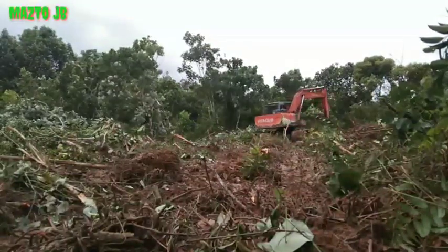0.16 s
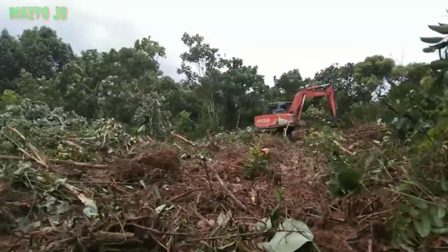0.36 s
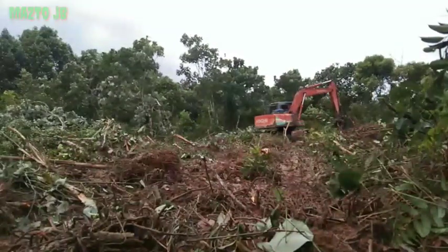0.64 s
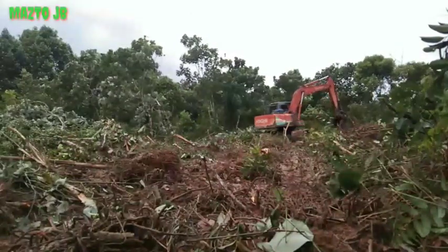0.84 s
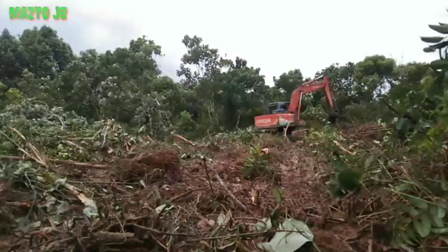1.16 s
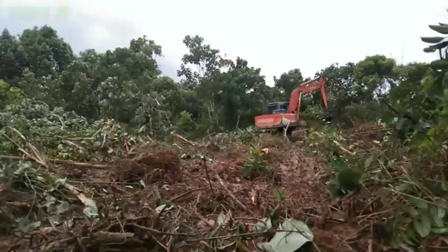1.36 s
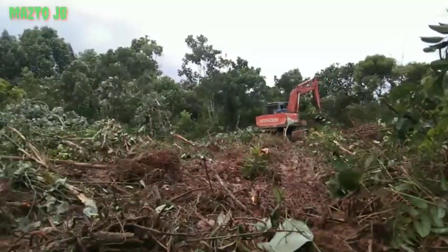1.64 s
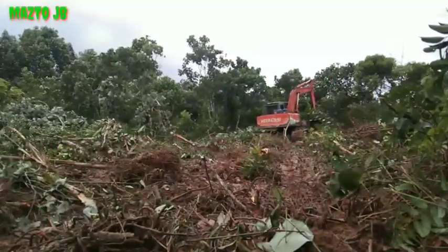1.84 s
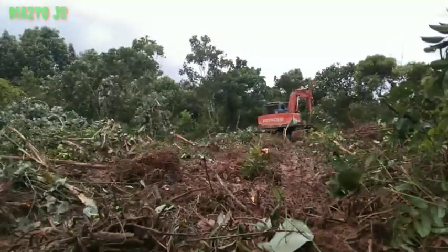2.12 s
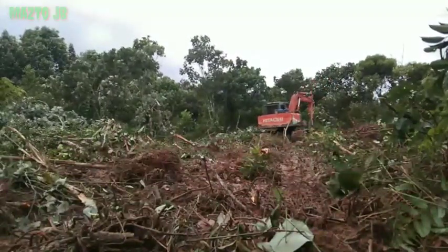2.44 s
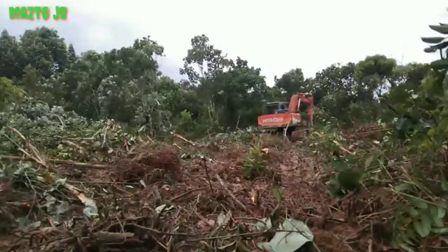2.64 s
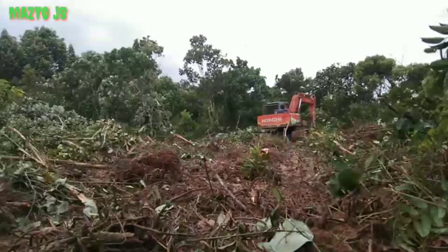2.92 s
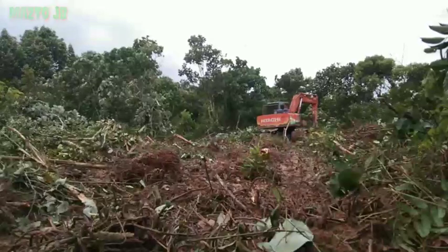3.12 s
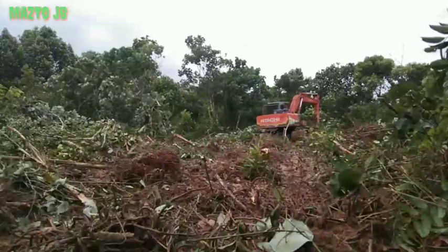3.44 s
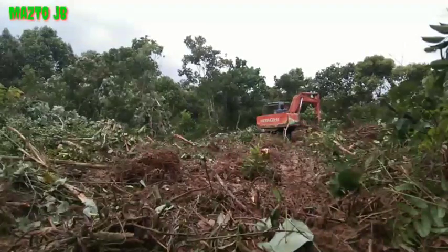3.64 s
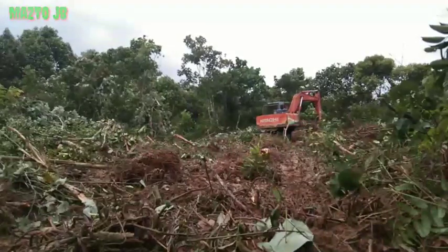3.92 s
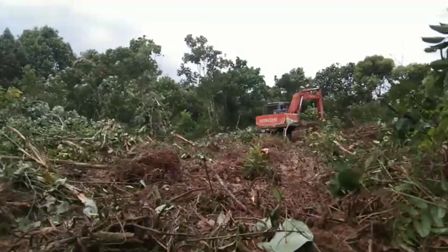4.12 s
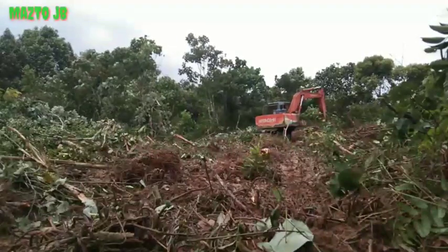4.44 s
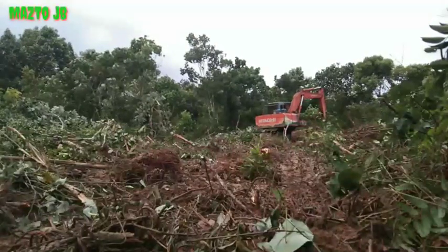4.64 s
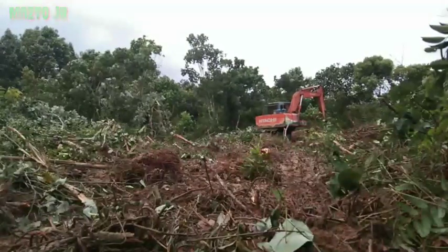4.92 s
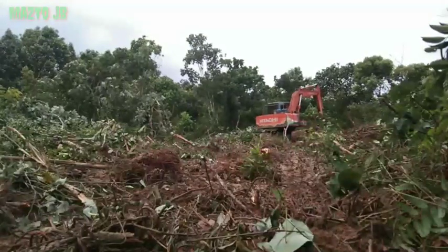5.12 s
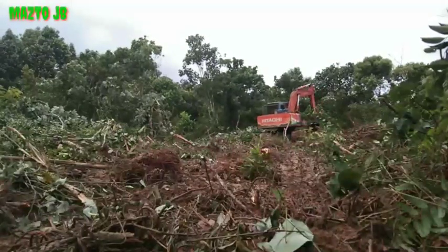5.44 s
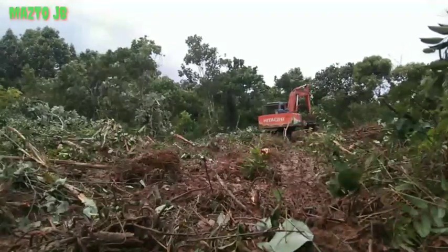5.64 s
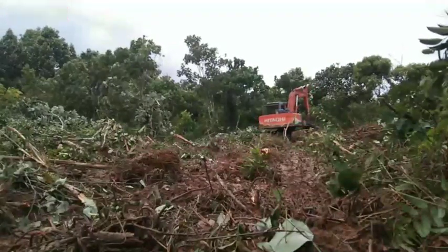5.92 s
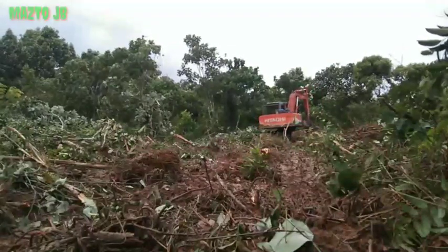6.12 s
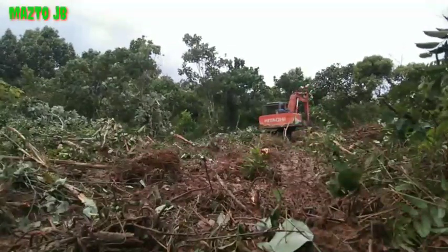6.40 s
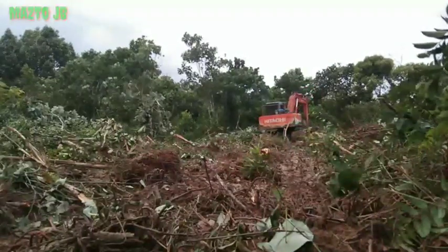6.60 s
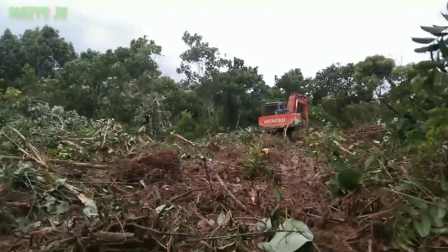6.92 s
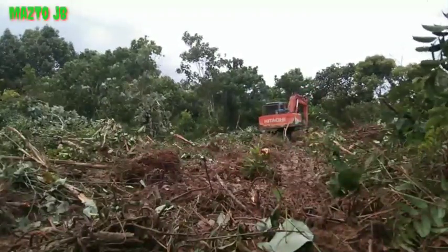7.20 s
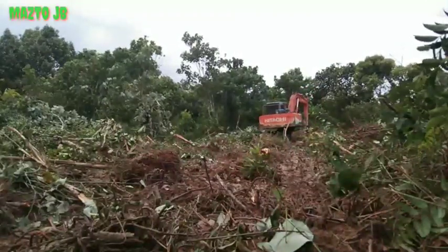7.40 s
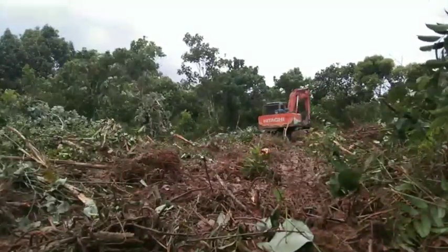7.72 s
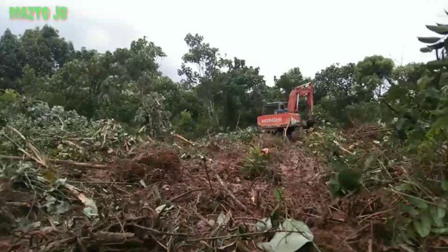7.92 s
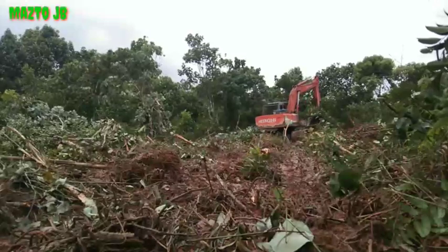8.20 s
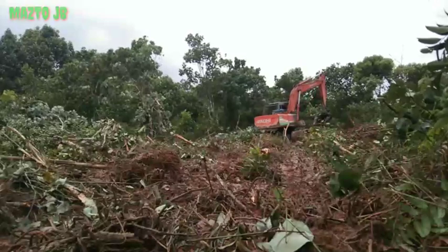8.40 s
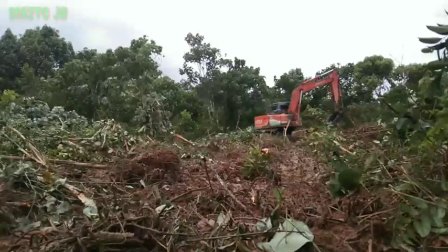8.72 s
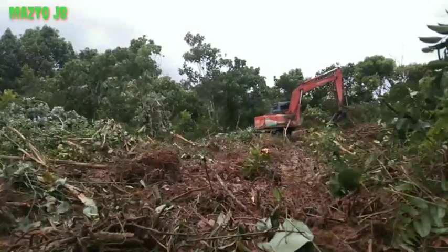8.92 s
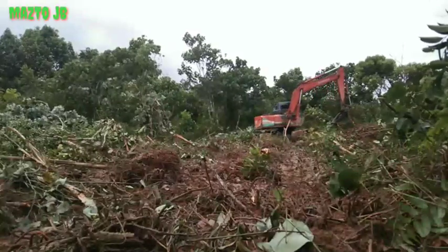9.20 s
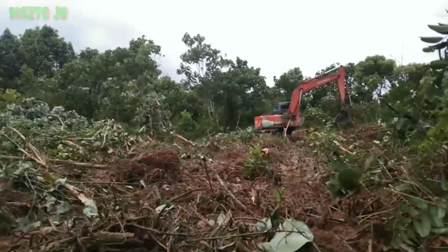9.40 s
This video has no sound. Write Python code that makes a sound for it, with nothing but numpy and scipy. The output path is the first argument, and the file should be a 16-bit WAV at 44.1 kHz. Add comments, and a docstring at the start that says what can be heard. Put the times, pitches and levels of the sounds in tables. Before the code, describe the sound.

Sharp, woody branch cracks with short diffuse forest echoes stand far above a quiet bed of engine hum and soft broadband wash. They open densely, thin out, nearly stop around four seconds, then build to the loudest splintering just after seven. Hollow knocks, twig ticks, brief hydraulic whines and blurred steel bucket rings accompany them, heard at a distance through a noise-suppressing camera microphone.

```python
"""A distant excavator clears brush at the edge of a forest. Its diesel is a few unsteady exhaust orders,
its hydraulic pump a gliding tone with an octave, its bucket a set of blurred steel modes.
Branches break as bursts of coloured clicks with forest echoes; knocks, twigs and stems ring like noise-blurred wood.
Leaves rustle, a thin band of treble flickers high up, a steady wash lies beneath,
and the camera's noise suppressor holds down whatever is faint."""
import sys
import numpy as np
from scipy import signal
from scipy.fft import irfft, next_fast_len
from scipy.io import wavfile
from scipy.ndimage import uniform_filter1d

SR = 44100
rng = np.random.default_rng(int(sys.argv[2]) if len(sys.argv) > 2 else 0)


def dump_mix(stems):
    """Bounce the given channels to the path in sys.argv[1] as a 16-bit WAV at rate SR."""
    frames = np.atleast_2d(stems).T  # one column per channel
    limited = np.clip(frames, -1, 1)  # hard clip at full scale
    pcm = np.round(limited * 32767).astype(np.int16)
    wavfile.write(sys.argv[1], SR, pcm)


N = 421155
T = np.arange(N) / SR
LEAD_S = .02  # a branch strains this long before it snaps

# Mean firing rate of the four-cylinder diesel, sagging under load: t/s, f/Hz
FIRING_RATE = [(0, 61.3), (.25, 61.45), (.6, 65.25), (1, 62.65), (2, 67.3), (3, 64.3), (4.1, 64.7),
               (4.5, 66.5), (5, 65.4), (5.55, 63.94), (6.6, 65.8), (7, 65.16), (7.4, 65.3), (7.8, 63.07),
               (8.55, 63.73), (8.8, 66.24), (9.15, 66.63), (9.55, 67.9)]
# Colour of green wood breaking, also lent to the leaves: f/Hz, relative level/dB
WOOD_COLOUR = [(60, -40.5), (150, -22.5), (240, -16.5), (320, -9.5), (420, -6.5), (550, -3.5), (860, 3),
               (1350, 3.5), (1900, 4), (2400, -1.5), (3050, -3.5), (3900, -10), (5200, -10), (6200, -14.5),
               (7600, -14.5), (8500, -36.5)]


def amp(db):
    """Decibels to gain."""
    return 10 ** (np.asarray(db) / 20)


def unit(x):
    """Scales to rms 1."""
    return x / np.sqrt(np.mean(x ** 2) + 1e-20)


def curve(rows):
    """Joins (t/s, value) rows by straight lines."""
    return np.interp(T, *np.transpose(rows))


def read(points, hz):
    """Reads (f/Hz, value) points on a log-frequency axis."""
    f, value = np.transpose(points)
    return np.interp(np.log(hz + 1), np.log(f + 1), value)


def add(mix, s, sound):
    """Mixes a sound in at time s, cutting what lies outside the mix."""
    start = round(s * SR)
    sound = sound[max(-start, 0):]
    part = mix[max(start, 0):][:len(sound)]
    part += sound[:len(part)]


def drift(rate_hz):
    """Random fluctuation of rms 1, mostly slower than rate_hz."""
    size = next_fast_len(N)
    hz = np.fft.rfftfreq(size, 1 / SR)
    hz = hz[hz < 8 * abs(rate_hz)]
    random_lines = rng.standard_normal((len(hz), 2)) @ [1, 1j]
    return unit(irfft(random_lines / (1 + (hz / rate_hz) ** 4), size)[:N])


def colour(x, db_at, size=2048):
    """Causal minimum-phase filter whose gain in dB is the function db_at(Hz)."""
    hz = abs(np.fft.fftfreq(size, 1 / SR))
    log_gain = np.log(amp(db_at(hz)))
    taps = np.fft.ifft(np.exp(np.conj(signal.hilbert(log_gain)))).real
    return signal.oaconvolve(x, taps)[:len(x)]


def bouts(rows, ramp_s, rest_db):
    """Level in dB that rises from rest before each (start, end, dB) row, holds, and falls back after it."""
    level = np.full(N, float(rest_db))
    for start, end, db in rows:
        # a row that ends before it starts rises only part of the way, or not at all
        held = np.clip(1 + np.minimum(T - start, end - T) / ramp_s, 0, 1)
        level = np.maximum(level, rest_db + held * (db - rest_db))
    return level


def drag():
    """How hard the bucket drags the brush, in dB; the pile takes a moment to move and never lies quite still."""
    # Pulls through the brush: start t/s, end t/s, level/dB
    pulls = [(-.3, 1.32, -55), (2.2, 3.38, -61.5), (4.5, 4.2, -60), (5.55, 7.4, -58), (7.3, 7.9, -50.5),
             (8.0, 8.46, -65)]
    return bouts(pulls, ramp_s=0.28, rest_db=-63)


def forest(x, near_db=8, near_s=0.002, build_s=0.0013, size=22050):
    """Sound arrives only by way of trunks and leaves: a near cluster, then a tail whose treble dies early."""
    # Echo of the forest edge: f/Hz, t60/s
    echo_times = [(200, 0.309), (900, 0.35), (2500, 0.24), (8000, 0.22)]
    t = T[:size]
    hz, frames_s, z = signal.stft(rng.standard_normal(size), SR, nperseg=256)
    fading = amp(-60 * frames_s / read(echo_times, hz)[:, None])
    tail = signal.istft(z * fading, SR, nperseg=256)[1][:size]
    near_cluster = 1 + amp(near_db) * np.exp(-t / near_s)
    tail = tail * (1 - np.exp(-t / build_s)) * near_cluster
    return signal.oaconvolve(x, tail / np.linalg.norm(tail))[:len(x)]


def blurred_noise(echoes, width_hz):
    """Complex noise through two equal poles: the slow random grain that many echoes give to a mode."""
    pole = np.exp(-np.pi * width_hz / SR)
    return signal.lfilter([1], [1, -2 * pole, pole ** 2], echoes)


def ring(hz, t60, build_s=0.00087, size=9000):
    """A narrow wooden resonance, blurred by its many echoes, at rms 1 over its first 25 ms."""
    t = T[:size]
    echoes = rng.standard_normal(size) + 1j * rng.standard_normal(size)
    tone = (blurred_noise(echoes, width_hz=130) * np.exp(2j * np.pi * hz * t)).real
    sound = tone * amp(-60 * t / t60) * (1 - np.exp(-t / build_s))
    return sound / np.std(sound[:SR // 40])


def wash(level_db=-64.0, swell_db=0.1):
    """Far noise of fan, exhaust and foliage: coloured noise that hardly swells."""
    # Colour of the wash: f/Hz, relative level/dB
    wash_colour = [(20, -14.5), (55, -13), (100, -2.5), (160, -3.5), (240, -9), (420, -10.5), (600, -7),
                   (1000, -13), (1400, -5.5), (2500, -13.5), (4000, -15.5), (6000, -19.5), (7500, -16),
                   (8500, -30)]
    noise = colour(rng.standard_normal(N), lambda hz: read(wash_colour, hz))
    return amp(level_db + swell_db * drift(5.9)) * unit(noise)


def treble_flicker(centre_hz=6850, width_hz=110, flicker_db=4.5):
    """A thin, flickering band of treble near 6.85 kHz that comes and goes."""
    # Bouts of the band: start t/s, end t/s, level/dB before the flicker
    treble_bouts = [(.25, .4, -65), (2.2, 2.45, -70), (3.4, 3.75, -72), (4.45, 4.65, -66.5),
                    (5.2, 5.7, -69.5), (7.7, 8.85, -68.5)]
    pitch_hz = centre_hz + 50 * drift(3.8)
    tone = drift(width_hz) * np.cos(2 * np.pi * np.cumsum(pitch_hz) / SR)
    flickering = unit(tone * amp(flicker_db * drift(15)))
    return amp(bouts(treble_bouts, ramp_s=0.096, rest_db=-78.5)) * flickering


def rustle(trim_db=-11, flicker_db=2.5, most_db=-55):
    """Leaves brush past each other in uneven gusts: wood-coloured noise that follows the drag up to a limit."""
    leaves = colour(rng.standard_normal(N), lambda hz: read(WOOD_COLOUR, hz))
    level_db = np.minimum(drag(), most_db) + trim_db + flicker_db * drift(2.7)
    return amp(level_db) * unit(leaves)


def creaks(spread_db=3.0, rest_db=-69, t60=0.3, count=130):
    """Bent stems creak and tick faintly as the pile shifts, each at a low pitch of its own."""
    out = np.zeros(N)
    for when, size, pitch in rng.random((count, 3)):
        hz = 560 + 1750 * pitch
        level_db = -spread_db * np.log(max(size, .1))
        add(out, when * T[-1], amp(level_db) * ring(hz, t60))
    # half as many dB as the drag rises above its resting -63 dB
    return amp(rest_db + .5 * (drag() + 63)) * unit(out)


def twigs(spread_db=2.0, trim_db=-8, t60=0.21, most_db=-60, follow=3.5, count=170, pitches_each=4):
    """Small twigs give way at random as brush is dragged, each ringing at a few pitches of its own."""
    # Colour of small twigs: f/Hz, relative level/dB
    twig_colour = [(500, 7), (900, -6.5), (1700, -3.5), (2600, -7), (4000, -7.5), (5200, -6), (7500, -3)]
    out = np.zeros(N)
    for when, size, *pitches in rng.random((count, 2 + pitches_each)):
        for hz in 700 + 7100 * np.array(pitches) ** 1.4:
            level_db = read(twig_colour, hz) - spread_db * np.log(max(size, .1))
            add(out, when * T[-1], amp(level_db) * ring(hz, t60))
    # steep below most_db of drag, level above it
    level_db = most_db + follow * np.minimum(drag() - most_db, 0) + trim_db
    return amp(level_db) * unit(out)


def knocks(trim_db=-2, ring_cycles=240, longest_t60=.26):
    """Wood knocks and ticks, from low limbs to thin high twigs; higher ones ring shorter."""
    # Wood knocks and ticks: t/s, f/Hz, level/dB before the trim
    struck_wood = [(.135, 213.4, -49.5), (.14, 1886, -38), (.24, 1353, -48), (.435, 1332, -38.5),
                   (0.862, 1360, -53.5), (1.23, 653.6, -59.5), (1.591, 2573, -44), (1.773, 2665, -53),
                   (2.024, 1940, -52.5), (2.135, 671, -53), (2.321, 1336, -42), (2.325, 2946, -47.5),
                   (2.544, 1071, -44.5), (2.932, 3200, -68), (3.031, 1984, -57.5), (3.06, 2760, -61),
                   (3.456, 1687, -56.5), (3.457, 5170, -63), (4.003, 1200, -58.5), (4.06, 3760, -70),
                   (4.18, 2780, -63.5), (4.19, 2138, -64.5), (4.29, 2040, -63), (4.596, 1857, -44),
                   (4.682, 5260, -56), (4.715, 889, -49), (4.713, 432, -53.5), (4.9, 644, -60),
                   (5.2, 835, -53), (5.27, 1460, -58.5), (5.146, 296, -51), (5.433, 4930, -63.5),
                   (5.727, 1960, -45), (6.011, 4670, -57), (6.17, 856, -36), (6.335, 935, -47.5),
                   (6.41, 1930, -58), (6.423, 823, -53), (6.512, 796.2, -49.5), (6.752, 1706, -52),
                   (6.855, 1705, -57.5), (7.21, 1274, -28.5), (7.265, 1466, -31.5), (7.4, 1723, -38),
                   (7.451, 1690, -32.5), (7.53, 1606, -37), (7.895, 1727, -55), (8.01, 3980, -67.5),
                   (8.065, 5040, -62), (8.072, 6080, -63), (8.085, 7000, -61.5), (8.25, 5210, -69),
                   (8.341, 2020, -62), (8.459, 1501, -60.5), (8.454, 303.4, -60), (8.577, 1420, -59),
                   (8.741, 1766, -48), (8.892, 1777, -61.5), (9.186, 1217, -61)]
    out = np.zeros(N)
    for s, hz, db in struck_wood:
        t60 = min(ring_cycles / hz, longest_t60)
        add(out, s, amp(db + trim_db) * ring(hz, t60))
    return out


def crack(db, body_db, bite_db, bright_db, fizz_db, tear_s, fibres_per_s=380, fibre_size=0.54, uneven_db=4,
          strain_s=0.0043, resonance_db=5, size=14000, level_samples=2200, splinters=2):
    """A few fibres give, the branch snaps, and the rest tear ever more weakly in separate echoing splinters."""
    t = T[:size] - LEAD_S
    # the core of the wood, 890 to 1820 Hz, is the same for all
    grade = [(417, body_db), (890, 0), (1820, 0), (3000, bite_db), (4940, bright_db), (7000, fizz_db)]
    tension = np.exp(np.where(t < 0, t / strain_s, -t / max(tear_s, .002)))
    sound = np.zeros(size)
    for splinter in range(splinters):
        unevenness = np.minimum(rng.exponential(1, size), 2) - 1
        strength = rng.choice([-1, 1], size) * amp(uneven_db * unevenness)
        fibres = strength * (rng.random(size) < fibres_per_s / splinters / SR)
        clicks = fibre_size * fibres * tension
        clicks[round(LEAD_S * SR)] = splinter == 0  # the first splinter carries the snap
        # each splinter has peaks and dips of its own
        mode_db = resonance_db * np.clip(rng.standard_normal(48), -2, 1.1)
        modes = np.column_stack([np.linspace(400, 8000, num=48), mode_db])
        wooden = colour(clicks, lambda hz: read(WOOD_COLOUR, hz) + read(grade, hz) + read(modes, hz))
        sound += forest(wooden, size=size)
    return amp(db) * sound / np.std(sound[:level_samples])


def branches(trim_db=-5):
    """All the breaks of the arm's work, each placed so that its snap falls on its time."""
    # Breaking branches: snap t/s, level/dB before the trim, body/dB, bite/dB, brightness/dB, fizz/dB,
    # splintering time/s (at least 0.002 is used)
    breaks = [(-.004, -33, 5, -0.5, 4, 0, 0.04), (.041, -34.5, 1, 0, 6, 0.5, 0.006),
              (.079, -38.5, -2, 3, -16.5, -6.5, 0.026), (.101, -38, 15.5, 6, 5.5, -5, 0.016),
              (.127, -29.5, 4, 4, 1.5, -1.5, 0.027), (.148, -30, 11, 3.5, 6, 7.5, 0.023),
              (.212, -34.5, 1, 2, 6, 0.5, .012), (.327, -51.5, 10, -16, -6.5, 7.5, 0.029),
              (.372, -52, -5, 1, 11.5, 0.5, 0.0066), (.42, -34, 8, 3.5, 6.5, -4, 0.021),
              (.479, -36.5, 1.5, 2, 7, -7, 0.011), (1.332, -42.5, 1.5, 4, -17, -11.5, 0.021),
              (1.355, -44.5, 9, 11, -3, 10.5, 0.0048), (1.404, -33.5, -1, 2.5, 6, -3.5, 0.0035),
              (1.573, -43.5, -15, -1, -14.5, -17, 0.026), (1.589, -46, -5.5, -4, 10.5, -8.5, 0.036),
              (1.633, -42, -3.5, 4.5, -2.5, -2, 0.0064), (1.707, -45.5, 9, 3, -11.5, -14.5, 0.0035),
              (1.774, -42.5, -2.5, -5.5, -12, -12, 0.03), (2.02, -52, 4, 1, -2, 4, 0.0024),
              (2.244, -51, 0, -13.5, -4, 6.5, 0.044), (2.323, -41.5, -14.5, 9.5, 10, 7, 0.024),
              (2.446, -49.5, 0, -6, -17.5, -16, 0.073), (2.502, -41, -2.5, -9, -16, -12, 0.02),
              (2.531, -34, 0.5, -6.5, 4.5, -1, .03), (2.578, -42.5, 0, 8, -6, 0, 0.013),
              (2.628, -38.5, -11, -1, 5.5, 1.5, 0.0063), (2.839, -51.5, -4.5, 4.5, 1, 2, 0.007),
              (3.031, -58.5, 3, 6, -6, -8, 0.0094), (3.06, -54, 0, 4.5, -11, 3, .012),
              (4.517, -50.5, 7, -9, -12, -15, 0.01), (4.591, -43.5, 0, -12, -9, -20.5, 0.036),
              (4.68, -47.5, 7.5, 0, -7, 5.5, 0.011), (4.712, -42.5, 12.5, -1, 9, 4, 0.0024),
              (4.85, -56, 1.5, -7.5, -5.5, 2.5, 0.02), (5.132, -35.5, -5, -3, -15, -18, 0.0095),
              (5.43, -42.5, -14.5, -5, -26.5, -7, 0.018), (5.46, -51.5, 10.5, -8.5, 5, -9.5, 0.0042),
              (5.511, -50, -6, -9, 0, 7.5, 0.016), (5.631, -54, 1.5, -6.5, -3, 8.5, 0.0095),
              (5.726, -41.5, 2, -5.5, 0.5, -9, 0.062), (5.819, -34, 2, 1, 4.5, -19, 0.016),
              (5.847, -39.5, -1.5, -4, -10, -5, 0.0047), (5.89, -35.5, 10.5, 3, -7.5, -5.5, 0.039),
              (5.912, -43.5, 1, -8, 15, 2, 0.029), (5.949, -32.5, 1.5, -3.5, -3.5, -6, 0.0064),
              (6.008, -37, 3.5, -5.5, 10.5, -10, 0.0097), (6.043, -46.5, 0.5, 5.5, 2.5, -9.5, 0.0081),
              (6.138, -43, 7, 3.5, 6.5, -4, 0.078), (6.168, -27.5, -4, 3.5, 4, 0.5, 0.02),
              (6.213, -35.5, 6.5, 5.5, 13.5, 5, 0.014), (6.335, -56, -5, -3, -1, -1, 0.013),
              (6.423, -52.5, 7.5, -10, -11.5, -11, 0.022), (6.513, -40, 5.5, -4.5, -1.5, -15.5, 0.0089),
              (6.555, -53.5, 9, -2.5, 11.5, 2.5, 0.0052), (6.707, -52.5, 15, -1.5, -6.5, 0.5, 0.0074),
              (6.748, -54.5, 4, 12, 19, 17, 0.069), (6.856, -72.5, -6.5, -4, -5, 4.5, 0.0073),
              (6.933, -58.5, -0.5, 0.5, 4, 7.5, 0.037), (7.205, -24, 3, 10, 2.5, 11.5, 0.03),
              (7.226, -32, -3.5, 1.5, 7.5, 1.5, 0.0082), (7.261, -26.5, 6.5, 4.5, 4.5, 7, 0.0306),
              (7.351, -38.5, 1.5, 3, 0, -11, 0.11), (7.436, -36.5, -3, 1, 5, -12, 0.037),
              (7.452, -31, 0, -1, -4, -7, 0.0027), (7.463, -31, 4.5, 1.5, 0.5, 0, 0.064),
              (7.52, -31.5, -9, 0.5, -1, -1, 0.017), (7.547, -43, -8.5, 6, 0, 6, 0.004),
              (7.609, -38, 5.5, -1.5, -14, -2.5, 0.019), (7.651, -32.5, 4.5, 1, 4, -2, 0.022),
              (7.689, -36, -4.5, 9.5, 5, 12, 0.0033), (7.785, -50, 1.5, -4.5, -4.5, -4.5, 0.015),
              (7.892, -53.5, 4.5, -1, 1, 9.5, 0.053), (8.489, -59.5, -2, -2.5, 7.5, 21, .02),
              (8.746, -55.5, -0.5, -8.5, -3.5, 2.5, 0.0077), (8.825, -58, 13, 2, 3.5, -1, 0.072),
              (8.937, -56.5, 3.5, -1, 6, 10, 0.0095)]
    out = np.zeros(N)
    for s, *blow in breaks:
        add(out, s - LEAD_S, crack(*blow))
    return amp(trim_db) * out


def bucket(build_s=0.00086, size=18000):
    """The steel bucket rings on after a blow; echoes make each mode flutter."""
    # Modes of the bucket: f/Hz before the blow's pitch factor, relative level/dB, t60/s
    steel_modes = [(894, -1, 0.33), (1328, 2.5, 0.26), (1920, -5.5, .24), (2090, -8.5, 0.28),
                   (2680, -14, 0.24), (3120, -17, 0.26)]
    # Blows on wood: t/s, level/dB, tilt/dB per octave above the first mode, pitch factor
    blows = [(1.408, -32, -30, 1.04), (1.59, -44.5, -2.5, 1.03), (1.636, -46.5, 3, .97),
             (1.783, -45.5, -3, 1.18), (2.533, -38, -0.5, 1.07), (2.842, -48, -2.5, 1),
             (5.131, -45, 5.5, 1.0), (6.169, -36, -4.5, 1.27), (7.205, -37.5, 1.5, 1.12)]
    t, out = T[:size], np.zeros(N)
    for s, db, tilt_db, pitch in blows:
        for hz, mode_db, t60 in steel_modes:
            echoes = blurred_noise(rng.standard_normal((size, 2)) @ [1, 1j], width_hz=70)
            flutter = 1 + .6 * echoes / np.std(echoes)
            tone = (flutter * np.exp(2j * np.pi * (hz * pitch * t + rng.random()))).real
            strength_db = db + mode_db + tilt_db * np.log2(hz / steel_modes[0][0])
            add(out, s, tone * amp(strength_db - 60 * t / t60) * (1 - np.exp(-t / build_s)))
    return out


def rumble(level_db=-74.5, follow=1.0, usual_db=-62):
    """The machine shakes more the harder it drags: low noise that follows the drag, up to 6 dB over usual."""
    shake_colour = [(20, -8.0), (52, -8.5), (90, -4), (140, -14.0), (260, -32), (600, -64.0)]  # f/Hz, dB
    shake = colour(rng.standard_normal(N), lambda hz: read(shake_colour, hz))
    return amp(level_db + follow * np.minimum(drag() - usual_db, 6)) * unit(shake)


def gears():
    """Faint whine of gears, fan and idling pump: blurred lines that follow the engine speed."""
    # Whining lines: multiple of the firing rate, level/dB
    gear_lines = [(7, -81.5), (9, -80), (10.5, -86), (13.5, -77.5), (20.5, -73.5), (22.5, -78), (33, -85.5)]
    turns = np.cumsum(curve(FIRING_RATE)) / SR
    out = np.zeros(N)
    for k, db in gear_lines:
        out += amp(db) * unit((1 + drift(14)) * np.cos(2 * np.pi * k * turns))
    return out


def pump(sway=0.007, opening_s=0.04, closing_s=0.086, octave_db=-15.5, trim_db=-2):
    """Nine pistons whine while a valve is open; rushing oil roughens the tone, which changes as pressure does."""
    # Pump strokes: start t/s, end t/s, harmonic of the piston rate, starting level/dB before the trim,
    # fading/dB per s (negative swells)
    strokes = [(0.356, 1.231, 3, -52.5, 9.5), (0.305, 0.9, 1, -52.5, -0.5), (0.876, 1.051, 2, -62, 4),
               (0.695, 1.107, 6, -70, -5.5), (1.114, 1.31, 6, -59.5, 7), (2.04, 2.216, 2, -56.5, 5),
               (2.325, 2.601, 2, -53, 3), (2.762, 2.88, 2, -54, 3.5), (3.265, 3.407, 2, -55.5, 7),
               (3.87, 4.001, 2, -61, 4), (4.054, 4.29, 2, -59.5, 3.5), (4.018, 4.309, 6, -59, 7),
               (5.07, 5.18, 2, -60, 0), (5.377, 5.61, 2, -57, 5), (5.838, 6.658, 2, -51.5, 7),
               (6.051, 6.55, 3, -55, 7), (6.65, 6.838, 1, -58, 4), (7.602, 8.18, 3, -45, 28),
               (7.749, 8.002, 6, -66, 6), (8.428, 8.57, 3, -58.5, 2.5), (8.651, 9.157, 3, -64, 2.5)]
    piston_hz = curve(FIRING_RATE) * 9 / 2  # the crankshaft turns once per two firings
    turns = np.cumsum(piston_hz * (1 + sway * drift(5.333))) / SR
    rough = .3 * drift(30) + .42j * drift(30) + .18 * (drift(110) + 1j * drift(110))
    out = np.zeros(N)
    for start, end, harmonic, db, fading_db_per_s in strokes:
        at = (T > start) & (T < end)
        t = T[at] - start
        valve = np.clip(np.minimum(t / opening_s, (end - T[at]) / closing_s), 0, 1)
        whine = np.exp(2j * np.pi * round(harmonic) * turns[at])
        with_octave = whine + amp(octave_db) * whine ** 2
        flutter = 1 + rough[at] * min(harmonic / 2.5, 1.3)  # the lowest whine is the steadiest
        out[at] += amp(db - fading_db_per_s * t) * valve * (flutter * with_octave).real
    echo = amp(-11) * forest(out)
    return amp(trim_db) * (out + echo)


def diesel(jitter=0.0064, waver=0.086, slip_turns=.14):
    """Only the lowest exhaust orders carry this far; the even chug stumbles now and then, more often under load."""
    # Exhaust note: multiple of the firing rate, relative level/dB
    exhaust_orders = [(.5, -36), (1, 0), (1.5, -18.5), (2, -3), (2.5, -22.5), (3, -25)]
    # Bouts of labouring: start t/s, end t/s, stumbles per s/dB
    labour_bouts = [(-.3, 3, 17), (4.4, 4.75, 15), (5.4, 7.8, 19), (8.3, 7.8, 14)]
    # Level of the hum, nearly steady: t/s, level/dB
    hum_level = [(0, -64.5), (8.8, -64), (9.3, -65), (9.55, -63.5)]
    stumbles_per_s = amp(bouts(labour_bouts, ramp_s=.2, rest_db=3))
    stumbles = rng.random(N) < stumbles_per_s / SR
    # each stumble shifts the phase for good, smoothed over 300 samples
    slips = uniform_filter1d(np.cumsum(stumbles * slip_turns * rng.standard_normal(N)), size=300)
    turns = np.cumsum(curve(FIRING_RATE) * (1 + jitter * drift(2.4))) / SR + slips
    note = np.zeros(N)
    for k, db in exhaust_orders:
        unsteady = 1 + waver * (drift(7) + 1j * drift(7))
        note += amp(db) * (unsteady * np.exp(2j * np.pi * (k * turns + rng.random()))).real
    return amp(curve(hum_level)) * unit(note)


def scene():
    """Machine, breaking wood and surroundings at one microphone."""
    surroundings = wash() + treble_flicker()
    brush = rustle() + creaks() + twigs() + knocks() + branches()
    machine = bucket() + rumble() + gears() + pump() + diesel()
    return (machine + brush + surroundings)[None]


def suppress(x, depth_db=8, open_db=10.5, knee_db=1.5, above_hz=200):
    """Turns down each bin that does not stand clear of the steady noise; the bass passes."""
    hz, _, z = signal.stft(x, SR, nperseg=1024, noverlap=768)
    power = uniform_filter1d(uniform_filter1d(abs(z) ** 2, size=3, axis=0), size=3, axis=1)
    # the quiet quarter of the time stands for the steady noise
    noise = uniform_filter1d(np.quantile(power, 1 / 4, axis=1), size=15)
    over_db = 10 * np.log10(abs(power / (noise[:, None] + 1e-20)) + 1e-9)
    shut = .5 - .5 * np.tanh((over_db - open_db) / knee_db)
    # no action below half of above_hz, full action from one and a half times it
    reach = np.clip(hz / above_hz - .5, 0, 1)[:, None] ** 2
    return signal.istft(z * amp(-depth_db * shut * reach), SR, nperseg=1024, noverlap=768)[1][:N]


def record(dry):
    """Noise suppressor, then the narrow band of the camera: a steep low-pass."""
    taps = signal.firwin(201, 8450, window=("kaiser", 7), fs=SR)  # cutoff in Hz
    return signal.oaconvolve(suppress(dry[0]), taps, "same")[None]


dry = scene()
out = record(dry)
dump_mix(out)
```